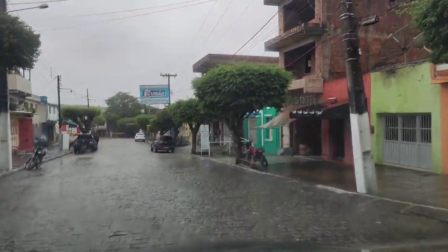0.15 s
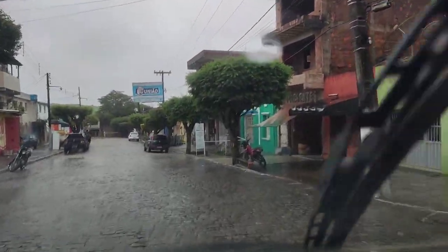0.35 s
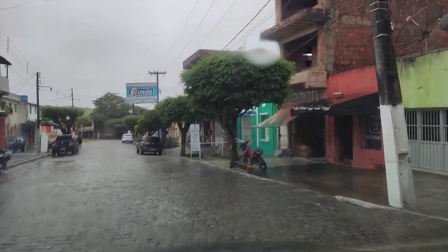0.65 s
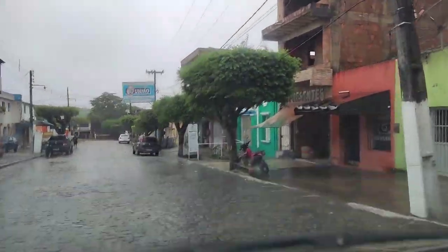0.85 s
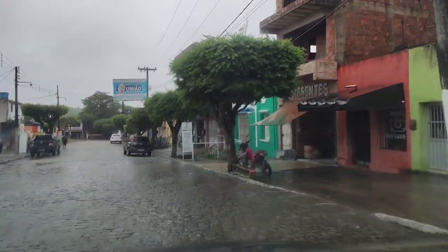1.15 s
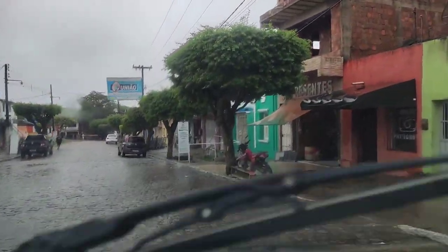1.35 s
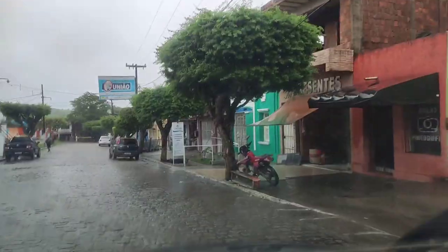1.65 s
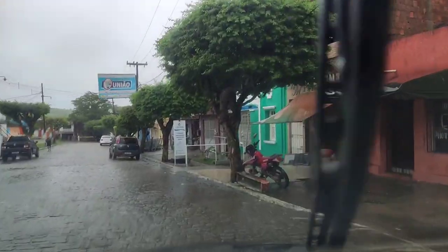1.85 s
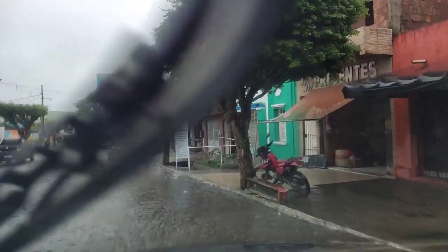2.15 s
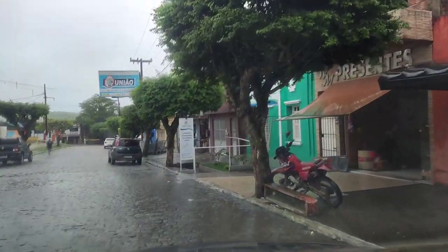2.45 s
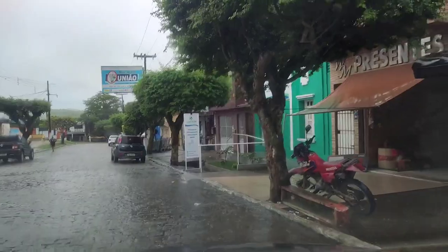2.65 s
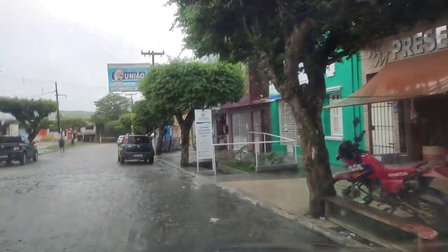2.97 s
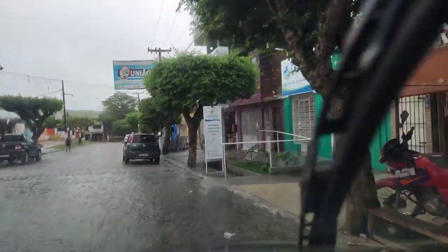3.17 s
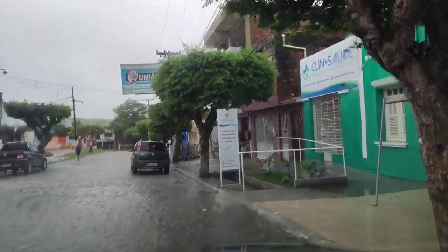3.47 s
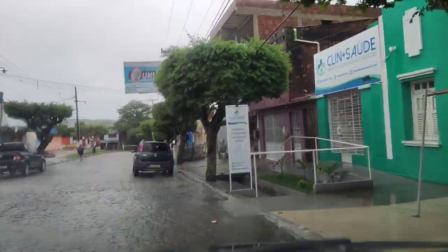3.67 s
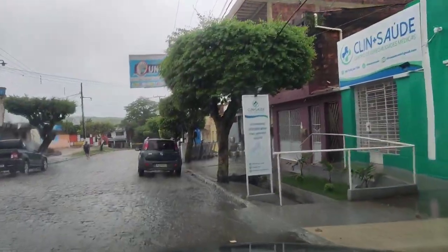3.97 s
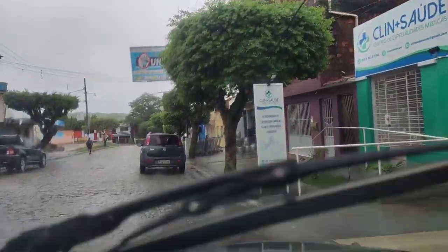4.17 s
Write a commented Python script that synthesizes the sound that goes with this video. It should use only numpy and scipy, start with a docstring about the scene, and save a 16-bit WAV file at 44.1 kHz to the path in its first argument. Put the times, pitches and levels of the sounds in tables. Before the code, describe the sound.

Heard from inside a car moving slowly along a wet cobbled street. A heavy low rumble and shuddering cabin boom dominate, with flickering tyre roar and a thin wet hiss that grows slightly. Loose plastic trim chirps and ticks, and dry crackles come singly or in clusters, thickest around one and two seconds. Soft booming bumps are more frequent in the later part. The microphone is in the cabin, close to the trim.

```python
"""The road under a car rolling slowly over wet cobblestones, heard from inside.
Shaped noise makes the rumble, the boom in the cabin, the tyre roar and a hiss that grows slowly louder.
Wavering tones make a deep shudder and booming bumps; narrow noise makes tread hum, swishes and a whistle.
Loose trim chirps (short sagging tones) and ticks (short bursts of ringing and scraping noise).
Dry crackles, made of sharp clicks, come singly or in short clusters."""
import sys
import numpy as np
from scipy import signal
from scipy.fft import rfft, irfft
from scipy.io import wavfile
from scipy.ndimage import uniform_filter1d, minimum_filter1d

SR = 44100
rng = np.random.default_rng(int(sys.argv[2]) if len(sys.argv) > 2 else 0)


def dump(signal):
    """Clip the signal to [-1, 1] and save it as 16-bit WAV at the path in sys.argv[1]."""
    limited = np.clip(np.atleast_2d(signal).T, -1, 1)
    pcm = np.round(limited * 32767).astype(np.int16)
    wavfile.write(sys.argv[1], SR, pcm)


N = 190115  # length in samples
TIME, HZ = np.arange(N) / SR, np.fft.rfftfreq(N, 1 / SR)  # seconds; frequencies of the spectrum

# trim sticking and slipping: peak_s [s], relative level_db [dB], pitch_hz at the peak [Hz]
CHIRPS = [(0.661, -32, 3420), (1.151, -41, 3340), (1.492, -38, 3310), (1.642, -44, 3260),
          (1.888, -45, 3330), (2.608, -34.5, 3390), (2.685, -30.5, 3460), (2.830, -41, 3230),
          (2.9, -39, 3300), (3.090, -33.5, 3460)]
# loose trim ticking: peak_s [s], relative level_db [dB], scrape_share [0-1], relative squeal_db [dB]
TICKS = [(0.072, -44, 0, -54), (0.699, -44, 0.2, -46), (0.735, -45, 0.2, -54), (0.784, -45, 0.1, -47),
         (0.857, -41.5, 0.1, -54), (0.951, -44, 0.2, -56), (1.114, -39, .16, -41), (1.493, -46, .4, -41),
         (1.643, -46, .1, -52), (1.714, -38, 0.1, -45), (1.749, -44, 0, -47), (1.811, -44, .4, -52),
         (1.996, -39, 0.2, -47), (2.722, -37, 0.75, -36), (2.760, -47, .8, -52), (2.938, -46.5, 0, -45),
         (3.129, -40, 0.4, -42), (3.167, -40, 0.2, -45), (3.302, -47.5, 0.3, -41), (3.339, -35.5, 0.5, -39),
         (3.498, -34.5, 0.5, -44), (3.534, -36.5, 0.05, -38.5), (3.658, -41, 0.8, -56),
         (3.748, -34.5, 0.15, -35), (4.047, -43.5, 0, -53)]
# what the trim rings with: pitch_hz [Hz], width_hz [Hz], relative level_db [dB]
TRIM_RINGS = [(2770, 230, 1), (5920, 600, -2), (8740, 430, 7), (12700, 2900, -10.5)]


def amp(db):
    """Turns decibels into gain."""
    return 10 ** (np.asarray(db) / 20)


def unit(x):
    """Scales a sound to an rms (average strength) of one."""
    return x / np.sqrt(np.mean(x ** 2) + 1e-20)


def shape(points):
    """Gain at every frequency, drawn through (Hz, dB) points."""
    hz, db = np.transpose(points)
    return amp(np.interp(np.log(HZ + 1), np.log(hz), db))


def peaks(modes):
    """Gain of a set of resonances; each falls to half at its width from the centre."""
    return sum(amp(db) / (1 + ((HZ - hz) / width_hz) ** 2) for hz, width_hz, db in modes)


def hump(hz, width_hz):
    """Gain of one smooth band around hz."""
    return np.exp(-((HZ - hz) / width_hz) ** 2)


def follow(points):
    """Joins (s, dB) points into a level at every moment."""
    return np.interp(TIME, *np.transpose(points))


def noise(gain):
    """Random noise of rms one with the given spectrum."""
    return unit(irfft(rfft(rng.standard_normal(N)) * gain, N))


def wander(hz):
    """A random curve of rms one that moves at up to about hz."""
    return noise(hump(0, hz))


def diffuse(gain):
    """Noise from all around: the deepest bass nearly alike in both channels, the middle range wide."""
    # freq_hz [Hz], side_minus_mid_db [dB]
    stereo_width = [(25, -28), (60, -23), (115, -7.5), (150, -12.5), (210, -23), (250, -9.5), (380, -10.5),
                    (680, -8.5), (1000, 0), (1450, 1), (2400, -0.5), (5500, 2), (7500, -12), (15000, -12)]
    mid = noise(gain)
    side = irfft(rfft(noise(gain)) * shape(stereo_width), N)
    return np.array([mid + side, mid - side])


def glide(band, shift_hz):
    """Slides a band of noise up or down by shift_hz, which may change over time."""
    turning = np.exp(2j * np.pi * np.cumsum(shift_hz) / SR)
    return (signal.hilbert(band) * turning).real


def wavering(hz, drift_hz, rate_hz, flutter):
    """A tone of rms one whose pitch and strength wander."""
    phase = 2 * np.pi * np.cumsum(hz + drift_hz * wander(rate_hz)) / SR
    return unit((1 + flutter * wander(rate_hz)) * np.sin(phase))


def burst(peak_s, rise, fall):
    """An envelope that swells to one at peak_s and dies away; rise and fall in seconds."""
    t = TIME - peak_s
    return np.exp(-np.minimum(np.where(t < 0, (t / rise) ** 2, t / fall), 60))


def cabin(x, wet_db, t60):
    """Direct sound plus dense reflections from glass and dashboard, down 60 dB after t60 seconds."""
    t = np.arange(SR // 6) / SR
    tail = rng.standard_normal((2, len(t))) * amp(-60 * t / t60)
    tail *= t > 0.002  # the first reflection arrives after 2 ms
    tail /= np.linalg.norm(tail, axis=1, keepdims=True)
    return x + amp(wet_db) * signal.fftconvolve(x[None], tail, axes=1)[:, :N]


def body(rumble_db=2, boom_db=-21, shudder_hz=28.73):
    """Cobbles shake the car body: it rumbles and shudders, and the cabin booms and drones."""
    # how hard the cobbles shake the body: time_s [s], level_db before rumble_db is added [dB]
    shake = [(0, -18), (0.35, -20), (1.0, -17.5), (1.8, -18), (2.55, -18), (2.72, -16), (3.55, -17),
             (3.7, -19.5), (4.0, -15.5), (4.3, -19.5)]
    # a deep shudder that rises and falls: time_s [s], level_db [dB]
    shudder = [(0, -18.5), (1.2, -16.5), (1.7, -16), (2.55, -16.5), (2.9, -23), (3.3, -18), (3.65, -31),
               (4.3, -14)]
    # colours of the body rumble and the cabin boom: freq_hz [Hz], relative level_db_per_hz [dB per Hz]
    rumble_colour, boom_colour = [(5, -35), (15, -26), (22, -3.5), (36, -2), (46, 0.5), (58, 0.5), (85, -8),
                                  (120, -20.5), (300, -99), (1000, -120)], [(10, -60), (50, -9), (90, 0.5), (115, -1.5), (140, -2),
                                                  (165, -0.5), (195, -4.5), (265, -5.5), (330, -15),
                                                  (600, -91), (2000, -110)]
    out = amp(follow(shake) + rumble_db) * diffuse(shape(rumble_colour))
    out += amp(boom_db) * diffuse(shape(boom_colour))
    out += amp(follow(shudder)) * wavering(shudder_hz, drift_hz=1.85, rate_hz=3.95, flutter=0.15)
    # one cabin resonance, 8.3 Hz wide, drones and grows by 0.75 dB per second
    drone_db = -29 + 0.75 * TIME
    return out + amp(drone_db) * diffuse(peaks([(144.6, 8.3, 0)]))


def tyres(air_db=-32, patter_db=1.27, splash_db=1.57, left_db=0.3):
    """Stones slap the tread and squeeze out water, so roar and hiss flicker together; tyre air rings."""
    # rougher and smoother stretches of cobbles: time_s [s], roar level_db before the flicker [dB]
    paving = [(0, -31.5), (0.25, -31), (0.5, -29), (0.78, -30), (0.98, -29), (1.17, -31), (1.38, -29.5),
              (1.68, -32.5), (1.92, -29), (2.25, -32.5), (2.44, -28.5), (2.75, -31), (3.27, -28),
              (3.58, -30.5), (4.3, -28.5)]
    # colours of the tyre roar and the wet hiss: freq_hz [Hz], relative level_db_per_hz [dB per Hz]
    roar_colour, hiss_colour = [(20, -50), (150, -58), (300, -1.5), (360, 0.5), (450, -1), (560, -4),
                                (680, -7), (860, -7.5), (1000, -12.5), (1200, -20), (1450, -18),
                                (1800, -27.5), (3000, -35.5), (12000, -101)], [(100, -30), (700, -17), (1800, 8), (2300, 12.5), (3000, 8.5),
                                              (4000, 8.5), (6000, 4), (7500, 1.5), (9000, -6),
                                              (10500, -3.5), (15500, -11.5)]
    # narrow resonances in the hiss: pitch_hz [Hz], width_hz [Hz], level_db relative to the hiss [dB]
    hiss_rings = [(3130, 20, -10), (3230, 46, -5), (5350, 38, -1), (6550, 45, -4), (8900, 750, 7.5)]
    # air ringing inside the tyres: pitch_hz [Hz], width_hz [Hz], relative level_db [dB]
    tyre_air = [(239, 3.5, 0), (472, 22, -12), (678, 42, -15)]
    stones = wander(hz=25.4)
    roar = amp(follow(paving) + patter_db * stones) * diffuse(shape(roar_colour))
    ringing = amp(air_db) * diffuse(peaks(tyre_air))
    hiss_db = -49.5 + 0.44 * TIME  # grows by 0.44 dB per second
    hiss_gain = shape(hiss_colour) * np.hypot(1, peaks(hiss_rings))
    spray = amp(hiss_db + splash_db * stones) * diffuse(hiss_gain)
    # a little louder on the left, softer on the right
    return (roar + ringing + spray) * amp([[left_db], [-left_db]])


def tread():
    """Narrow bands of tread noise; most glide up as the car gathers speed, some fade, some grow."""
    # start_hz [Hz], glide_hz_per_s [Hz per s], width_hz [Hz], start_db [dB], growth_db_per_s [dB per s]
    tread_bands = [(429.4, 0, 36, -37, -2.3), (1086, 22, 22, -70, 4.5), (1331, 5, 50, -55, -0.5),
                   (1415, 24, 36, -64.5, 3)]
    out = np.zeros((2, N))
    for hz, hz_per_s, width_hz, db, db_per_s in tread_bands:
        band = diffuse(hump(hz, width_hz))
        out += amp(db + db_per_s * TIME) * glide(band, hz_per_s * TIME)
    return out


def whistle(hz=2655, width_hz=72, steady_db=-61, swell_db=-58):
    """A soft, airy band of noise wavers in pitch and strength and swells once over a faint level."""
    level = amp(steady_db) + amp(swell_db) * burst(0.56, rise=0.5, fall=0.4)
    drift_hz, flicker_db = 14 * wander(hz=9), 1.2 * wander(hz=16)
    return level * unit(amp(flicker_db) * glide(noise(hump(hz, width_hz)), drift_hz))


def jiggle(per_s=35, level_db=-66, spread_db=5.0, length_s=0.0094):
    """Tiny random taps of uneven strength keep the trim buzzing faintly throughout."""
    strength = amp(spread_db * np.minimum(rng.exponential(1, N), 2))
    taps = (rng.random(N) < per_s / SR) * strength
    envelope = signal.oaconvolve(taps, signal.windows.hann(round(length_s * SR)), "same")
    buzz = envelope * noise(peaks(TRIM_RINGS))
    return cabin(amp(level_db) * unit(buzz), wet_db=3.5, t60=0.038)


def crackle(level_db=3):
    """Each crackle is a sharp, dry click that dies away at once, alike in both channels."""
    # single or bunched at uneven gaps: time_s [s], peak_db before level_db is added [dB]
    crackle_rows = [(0.042, -24.5), (0.1118, -25.5), (0.1175, -29), (0.1257, -30), (0.4418, -28),
                    (0.767, -28), (1.0618, -27), (1.0712, -24.5), (1.077, -32), (1.087, -26), (1.0915, -26),
                    (1.1015, -30), (1.1115, -30), (1.1213, -25.5), (1.1865, -28.5), (1.1966, -33),
                    (1.371, -32), (1.502, -27), (1.572, -31), (1.6016, -29), (1.7017, -28), (1.692, -26.5),
                    (1.7067, -24.5), (1.722, -26.5), (1.8262, -26), (2.007, -24.5), (2.0817, -26),
                    (2.092, -24.5), (2.0969, -24.5), (2.1113, -25.5), (2.132, -24.5), (2.197, -37),
                    (2.207, -29), (2.2313, -29), (2.247, -26), (2.257, -30), (2.2716, -38), (2.2814, -26.5),
                    (2.292, -28), (2.497, -25.5), (2.5576, -30), (2.6812, -24), (2.7468, -35),
                    (2.8726, -25.5), (3.357, -26.5), (3.3674, -34)]
    # colour of one crackle: freq_hz [Hz], relative level_db_per_hz [dB per Hz]
    crackle_colour = [(100, -15), (600, 9.5), (1400, 3), (2000, -1), (3000, -6.5), (4000, -13), (5300, -17),
                      (7300, -40), (9000, -28), (15500, -19), (17000, -47)]
    s, db = np.transpose(crackle_rows)
    kicks = np.zeros(N)
    kicks[np.round(s * SR).astype(int)] = amp(db + level_db)
    kicks *= rng.choice([-1, 1], N)  # each click points up or down at random
    click = 1j * shape(crackle_colour)  # a quarter turn of phase makes the click lopsided
    return irfft(rfft(kicks) * click, N) / irfft(click, N).max()


def ticks(rise=0.003, fall=0.0064, level_db=-2):
    """Loose trim buzzes briefly: part rings in its resonances, part is dry scrape."""
    # colour of the scrape: freq_hz [Hz], relative level_db_per_hz [dB per Hz]
    scrape_colour = [(300, -47), (1500, -13), (3000, 13.5), (5000, 2), (7500, 2.5), (10000, -1), (13000, 3),
                     (16000, -6)]
    ringing, scraping = noise(peaks(TRIM_RINGS)), noise(shape(scrape_colour))
    # every chirp brings a mostly scraping tick, 10 dB below the chirp's table level
    with_chirps = [(s, db - 10, 0.75) for s, db, _ in CHIRPS]
    out = np.zeros(N)
    for s, db, scrape_share, *_ in TICKS + with_chirps:
        blend = np.sqrt(1 - scrape_share) * ringing + np.sqrt(scrape_share) * scraping
        out += amp(db + level_db) * burst(s, rise, fall) * blend
    return cabin(out, wet_db=-7.0, t60=0.069)


def squeals(rows, waver, overtone_db, rise, fall, sag_hz_per_s=5000):
    """Plastic rubbing on plastic: a few milliseconds of unsteady tone that sags in pitch."""
    out, unsteady = np.zeros(N), 1 + waver * wander(hz=1500)
    for s, db, hz in rows:
        near = abs(TIME - s) < 0.05  # only compute close to the squeal
        pitch_hz = (hz - sag_hz_per_s * (TIME[near] - s)) * unsteady[near]
        phase = 2 * np.pi * np.cumsum(pitch_hz) / SR
        tone = sum(amp(level) * np.sin((k + 1) * phase) for k, level in enumerate(overtone_db))
        out[near] += amp(db) * burst(s, rise, fall)[near] * tone
    return out


def chirps(grit=0.43, tick_squeal_hz=2994):
    """Clear chirps rich in overtones, and a lower, hoarser squeal inside each tick, all roughened."""
    tick_rows = [(s, squeal_db, tick_squeal_hz) for s, _, _, squeal_db in TICKS]
    hoarse = squeals(tick_rows, waver=0.08, overtone_db=(0, -12, -15, -19), rise=0.0038, fall=0.0065)
    clear = squeals(CHIRPS, waver=0.028, overtone_db=(0.5, -10, -14.5, -19), rise=0.0024, fall=0.0049)
    rough = 1 + grit * wander(hz=500)
    return cabin((clear + hoarse) * rough, wet_db=-5, t60=0.055)


def swishes(hz=1350, width_hz=170, rise=0.07, fall=0.11):
    """The tyres swish through wetter patches: bursts of one band of noise."""
    # peak_s [s], level_db [dB]
    wet_patches = [(0.58, -51), (1.92, -46), (3.22, -48), (3.48, -48), (4.24, -42.5)]
    level = sum(amp(db) * burst(s, rise, fall) for s, db in wet_patches)
    return level * diffuse(hump(hz, width_hz))


def bumps(rise=0.055, fall=0.074):
    """Bumps in the street each ring the cabin with a short, unsteady boom."""
    # peak_s [s], level_db [dB], pitch_hz [Hz]
    bump_rows = [(1.40, -19, 136), (2.96, -20.5, 141), (3.25, -24.5, 215), (3.5, -24, 144),
                 (3.76, -19.5, 148)]
    out = np.zeros(N)
    for s, db, hz in bump_rows:
        tone = wavering(hz, drift_hz=4, rate_hz=12.7, flutter=0.15)
        out += amp(db) * burst(s, rise, fall) * tone
    return out


def scene():
    """Adds up road noise, trim and crackles."""
    road = body() + tyres() + tread() + swishes() + bumps()
    trim = jiggle() + ticks() + chirps()
    return road + whistle() + crackle() + trim


def limiter(x, ceiling=0.5, hold_s=0.03):
    """Turns the gain down smoothly around every peak above the ceiling."""
    gain = ceiling / np.maximum(abs(x).max(0), ceiling)
    size = round(hold_s * SR)
    return x * uniform_filter1d(minimum_filter1d(gain, size), size)


def record(dry, cut_hz=15800):
    """A limiter holds down the bass below about 200 Hz; then the top above cut_hz is removed."""
    bass = irfft(rfft(dry) / (1 + (HZ / 200) ** 4), N)
    held = dry - bass + limiter(bass)
    low_pass = signal.firwin(511, cut_hz, window=("kaiser", 9), fs=SR)
    return signal.oaconvolve(held, low_pass[None], "same")


dry = scene()
out = record(dry)
dump(out)
```